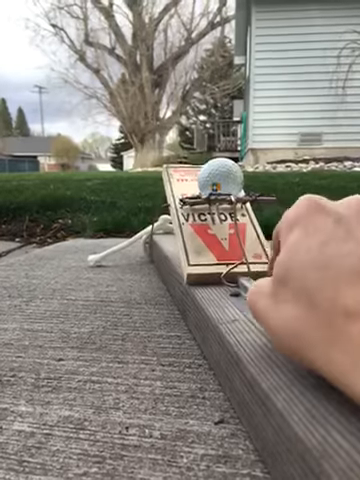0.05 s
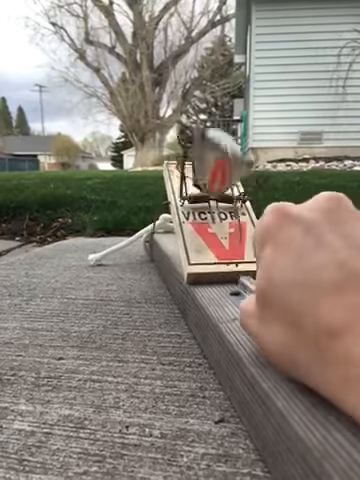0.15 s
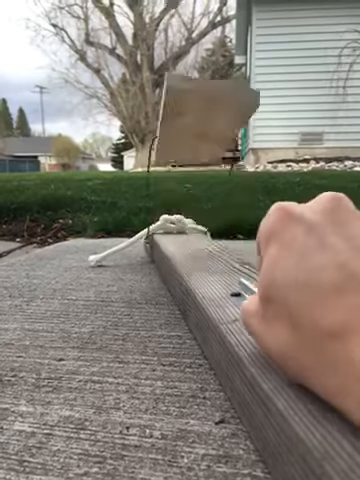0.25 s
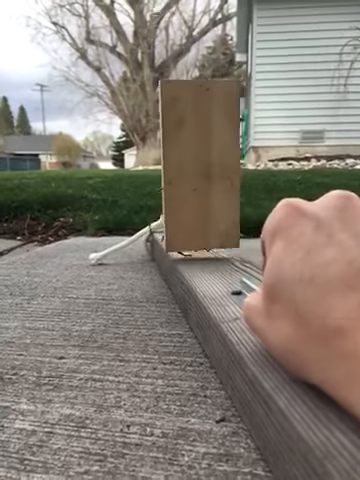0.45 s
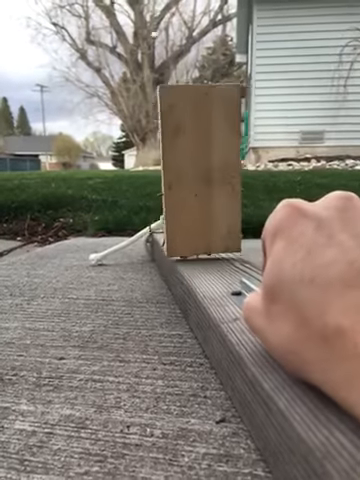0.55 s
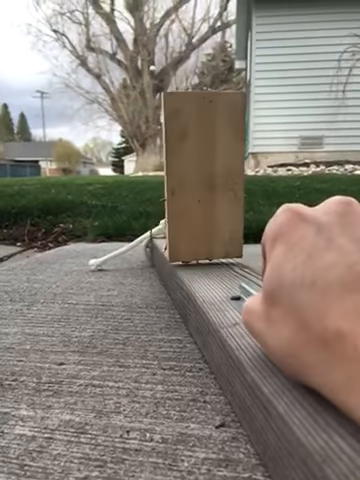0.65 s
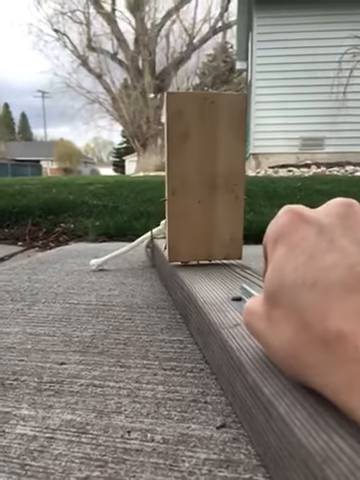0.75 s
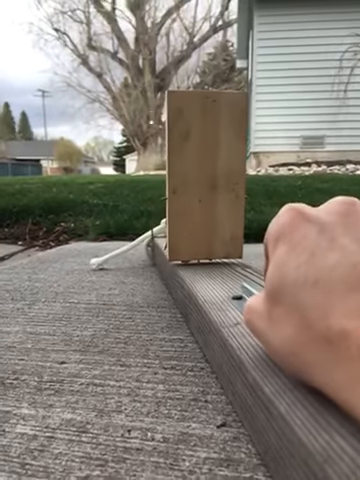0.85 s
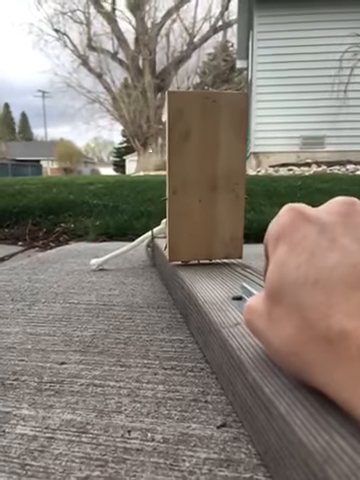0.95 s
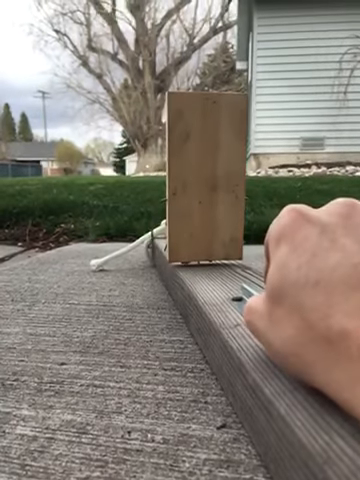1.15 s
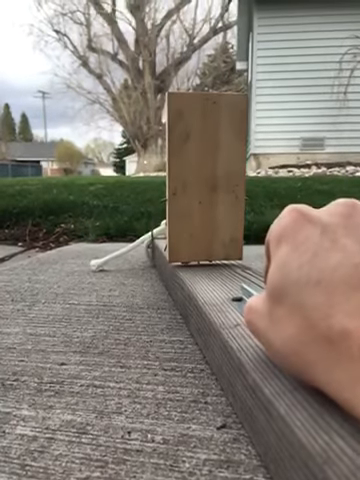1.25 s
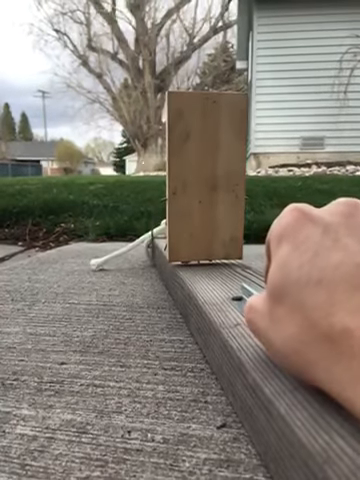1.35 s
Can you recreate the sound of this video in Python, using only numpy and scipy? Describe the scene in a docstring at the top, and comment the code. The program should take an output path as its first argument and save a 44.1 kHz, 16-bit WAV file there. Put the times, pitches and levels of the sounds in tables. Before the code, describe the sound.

A spring rat trap snaps loudly, then clatters onto a wooden beam outdoors.

```python
"""Three sharp cracks within 30 ms, then a clatter: a spring rat trap goes off close by, outdoors.
Its bar slams onto the board, loud enough to overload the microphone. The trap leaps, lands on a
wooden beam, rattles its loose wires and settles. The yard gives a faint echo, and a breeze
buffets the microphone over the rumble of distant traffic."""
import sys
import numpy as np
from scipy import signal
from scipy.fft import rfft, irfft
from scipy.io import wavfile
from scipy.ndimage import uniform_filter1d

SR = 44100
rng = np.random.default_rng(int(sys.argv[2]) if len(sys.argv) > 2 else 0)


def generate_wav(sig):
    """Save sig (samples, or channels by samples) to the path in sys.argv[1] as 16-bit PCM at SR."""
    pcm = np.round(np.clip(np.atleast_2d(sig).T, -1, 1) * 32767).astype(np.int16)
    wavfile.write(sys.argv[1], SR, pcm)


N = 61739

# A fade time (t60) is how long a sound takes to drop by 60 dB. A tilt above zero makes it brighter.
# The tones that board and spring ring with: (pitch [Hz], level [dB], fade time [s])
TRAP_TONES = [(1058, -27, .14), (1180, -25, .13), (1252, -18, .15), (1316, -21, .13), (1460, -15, .045),
              (2020, -3, .045), (1670, -29, .08), (2561, -17, .06), (2803, -15, .06), (3091, -16, .06),
              (3610, -21, .09), (4258, -14, .05), (8394, -15, .05), (8672, -15, .045)]
# Knocks on the beam: (time [s], level [dB], fade time [s], tilt [dB per octave], thud level [dB])
KNOCKS = [(0.422, -28.5, 0.056, 2.5, -62), (0.4308, -34, 0.091, 21, -60), (0.4365, -33, 0.056, -2, -52),
          (0.4425, -33.5, 0.031, 7, -64), (0.4498, -31, 0.023, 4.5, -41.5), (0.4514, -28, 0.026, -8.5, -41),
          (0.459, -43, 0.076, -3.5, -51), (0.5375, -45.5, 0.045, -5.5, -74),
          (0.5426, -42, 0.061, -2.5, -50.5), (0.655, -50, 0.067, -7.5, -54.5)]


def snap():
    """The bar whips over and slams down: cracks, a ringing board, a buzzing spring and a push of air."""
    # Blows of the bar: (time [s], level [dB], chatter length [s], tilt [dB per octave], air push [dB])
    blows = [(0.2123, -11.5, 0.0051, 0, -44), (0.2281, -8.5, 0.0039, -0.24, -38.5),
             (0.2405, -4, 0.0054, -0.26, -20.5)]
    # Tone colour of a crack: (frequency [Hz], relative level [dB])
    crack_colour = [(100, -16), (280, -3), (420, -11), (900, -4.5), (1400, -3), (2200, 0), (4000, -3.5),
                    (6000, -6), (8600, -2.5), (11000, -8), (15000, -7)]
    buzz_dull_hz, push_hz, push_delay_s = 3500, 68, 0.0038
    out, t = np.zeros(N), clock()
    for start, db, chatter_s, tilt_db, push_db in blows:
        gain = colour(crack_colour, tilt_db)
        crack = burst(gain, t60=0.028, slope=-0.1, hold=chatter_s)
        buzz = undb(-13) * noise(gain / np.sqrt(1 + bins() / buzz_dull_hz)) * fade(t, t60=0.12)
        push = undb(push_db) * np.sin(2 * np.pi * push_hz * t) * fade(t, t60=0.085)
        add(out, start, undb(db) * (crack + buzz + undb(-2) * ring(TRAP_TONES)))
        add(out, start + push_delay_s, push)
    return out


def landing():
    """The board rocks to rest, knocking on the beam, which thuds and cuts the board's ringing short."""
    # Tone colour of a knock: (frequency [Hz], relative level [dB])
    knock_colour = [(150, -13), (600, -20.5), (1000, -5.5), (1600, -0.5), (2900, -20), (4400, -8),
                    (7000, -23), (10000, -20.5), (15000, -32)]
    soft_hz = 2972  # wood on wood barely wakes the tones above this
    damped = [(hz, db - 20 * np.log10(1 + (hz / soft_hz) ** 2), 0.8 * t60) for hz, db, t60 in TRAP_TONES]
    out = np.zeros(N)
    for start, db, t60, tilt_db, thud_db in KNOCKS:
        knock = burst(colour(knock_colour, tilt_db), t60, slope=-0.11)
        thud = noise(hump(hz=360, octaves=2, order=2)) * fade(clock(), t60=0.11)
        add(out, start, undb(db) * (knock + undb(-1) * ring(damped)) + undb(thud_db) * thud)
    return out


def wires():
    """The loose catch and holding arm clink: each time a dry tick with a short, rough ring."""
    # Clinks: (time [s], level [dB], tick fade time [s], wire pitch [Hz], ring compared to tick [dB])
    clinks = [(0.19, -55.5, 0.09, 9200, -9), (0.2101, -37.5, 0.032, 4180, 3.5),
              (0.281, -60, 0.029, 3520, -5), (0.429, -62, 0.024, 4250, -11), (0.4212, -32, .022, 4200, 1),
              (0.4555, -38, .04, 4180, -4), (0.4628, -39, .03, 9000, -14), (0.4705, -51, .03, 4150, 4),
              (0.501, -61, .05, 9000, -4), (0.5812, -50.5, 0.1, 6220, -6), (0.686, -63.5, 0.068, 8950, -3)]
    # Tone colour of a tick: (frequency [Hz], relative level [dB])
    tick_colour = [(200, -15.5), (1000, 1.5), (2200, 8.5), (3200, -11.5), (6300, 0), (9500, -14.5),
                   (15000, -13.5)]
    out = np.zeros(N)
    for start, db, t60, hz, ring_db in clinks:
        tick = noise(colour(tick_colour)) * fade(clock(), t60)
        rough_ring = noise(hump(hz, octaves=0.04)) * fade(clock(), t60=0.04)
        add(out, start, undb(db) * (tick + undb(ring_db) * rough_ring))
    return out


def trigger():
    """The catch begins to slip with a short scrape, just before the snap."""
    return undb(-46) * noise(hump(hz=1570, octaves=0.16)) * swell(peak_s=0.066, width_s=0.0035)


def tremble():
    """From the first knock on the beam, the loose parts buzz on ever more faintly."""
    out = np.zeros(N)
    buzz = noise(hump(hz=2480, octaves=1.43, order=2)) * fade(clock(), t60=0.75)
    add(out, KNOCKS[0][0], undb(-55) * buzz)
    return out


def yard_echo(sound):
    """House wall, ground and trees scatter a faint echo back."""
    # Tone colour of the echo: (frequency [Hz], relative level [dB])
    echo_colour = [(150, -7.5), (700, -8), (1300, -0.5), (3000, 6), (5500, -1), (10000, -10.5),
                   (15000, -13.5)]
    tail = np.zeros(N)
    add(tail, start=0.011, sound=burst(colour(echo_colour), t60=0.42, slope=-0.12))
    tail /= np.sqrt(np.sum(tail ** 2))
    return undb(-37) * signal.fftconvolve(sound, tail)[:N]


def wind():
    """Air swirling on the microphone rumbles with each gust; a few deep buffets stand out."""
    # Strength of the breeze: (time [s], level [dB])
    gusts = [(0, -35.5), (.05, -41.5), (.096, -51), (.19, -43.5), (.31, -56.5), (.41, -56.5),
             (0.477, -39.5), (.56, -36.5), (.63, -45), (0.691, -35.5), (.82, -39.5), (.88, -47.5),
             (.92, -39), (1.05, -43), (1.09, -50.5), (1.28, -54), (1.34, -65.5), (1.4, -37)]
    # Tone colour of the breeze: (frequency [Hz], relative level [dB])
    wind_colour = [(20, -29), (40, -8), (65, 0.5), (105, -3.5), (150, -10), (220, -26.5), (400, -34),
                   (1000, -59.5), (8000, -100)]
    # Deep bumps of air: (time [s], level [dB], width [s], pitch [Hz])
    buffets = [(0.018, -36, 0.031, 52), (0.487, -27, 0.0033, 89), (0.685, -39.5, 0.034, 64.3),
               (0.755, -51, 0.017, 80.4), (1.205, -37.5, 0.0054, 83.7)]
    gust_db = np.interp(clock(), *np.array(gusts).T)
    out = undb(gust_db) * swirl(colour(wind_colour))
    for peak_s, db, width_s, hz in buffets:
        out += undb(db) * swell(peak_s, width_s) * swirl(hump(hz, octaves=0.49, order=2))
    return out


def town():
    """The distant town rumbles steadily, and a low hum of traffic grows towards the end."""
    # Tone colour of the rumble: (frequency [Hz], relative level [dB])
    town_colour = [(120, -25.5), (200, 0), (344, -12.5), (521, -9.5), (591, -5.5), (659, -15.5), (929, -10),
                   (1750, -22), (2290, -26), (15000, -51)]
    traffic = swell(peak_s=1.6, width_s=0.38) * noise(hump(hz=263.2, octaves=0.3))
    return undb(-56.5) * noise(colour(town_colour)) + undb(-50) * traffic


def undb(db):
    """Turn decibels into a gain, the number to multiply a sound by."""
    return 10 ** (np.asarray(db) / 20)


def clock():
    """The time of every sample, in seconds."""
    return np.arange(N) / SR


def bins():
    """The frequency of every thin slice (bin) of the spectrum, in Hz."""
    return np.maximum(np.arange(N // 2 + 1) * SR / N, 1)


def fade(age, t60):
    """Full strength until age zero, then 60 dB quieter every t60 seconds."""
    return np.exp(-np.log(1000) * np.maximum(age, 0) / t60)


def swell(peak_s, width_s):
    """A bell-shaped rise and fall."""
    return np.exp(-((clock() - peak_s) / width_s) ** 2 / 2)


def colour(points, tilt_db=0):
    """A gain for each bin, drawn through (Hz, dB) points and tilted; its average power is 1."""
    hz, db = np.array(points, float).T
    curve_db = np.interp(np.log(bins()), np.log(hz), db)
    gain = undb(curve_db + tilt_db * np.log2(np.maximum(bins(), hz[0])))
    return gain / np.sqrt(np.mean(gain ** 2))


def hump(hz, octaves, order=1):
    """A tone colour with one peak and average power 1; a higher order has steeper sides."""
    gain = 1 / (1 + (np.log2(bins() / hz) / octaves) ** 2) ** order
    return gain / np.sqrt(np.mean(gain ** 2))


def noise(gain):
    """Noise with the given tone colour."""
    return irfft(rfft(rng.standard_normal(N)) * gain, N)


def swirl(gain):
    """Swirling air: noise with its loudness evened out."""
    air = noise(gain)
    return air / np.sqrt(uniform_filter1d(air ** 2, size=2000))


def burst(gain, t60, slope, hold=0):
    """Noise that holds, then fades in t60 seconds at 2 kHz; with a slope below zero, highs die sooner."""
    out, spectrum = 0, rfft(rng.standard_normal(N)) * gain
    octaves_hz = 125 * 2. ** np.arange(8)
    for hz, share in zip(octaves_hz, np.eye(len(octaves_hz))):
        band = irfft(spectrum * np.interp(np.log(bins()), np.log(octaves_hz), share), N)
        out = out + band * fade(clock() - hold, t60 * (hz / 2000) ** slope)
    return out


def ring(tones, scatter_db=-0.5):
    """Pure tones that fade away, struck a little differently each time."""
    t = clock()[:N // 2]
    out = np.zeros(N)
    for hz, db, t60 in tones:
        nudge, phase = rng.standard_normal(2)
        out[:len(t)] += undb(db + scatter_db * nudge) * fade(t, t60) * np.sin(2 * np.pi * (hz * t + phase))
    return out


def add(track, start, sound):
    """Mix a sound into the track from its start time, in seconds."""
    i = int(start * SR)
    track[i:] += sound[:N - i]


def scene():
    """The trap and its echo over wind and town, in one channel."""
    trap = trigger() + snap() + landing() + wires() + tremble()
    fade_in = np.minimum(clock() / 0.006, 1)
    outdoors = (wind() + town()) * fade_in
    return (trap + yard_echo(trap) + outdoors)[None]


def record(dry):
    """The microphone loses the highest treble and flattens the loudest peaks."""
    top_hz, ceiling = 15400, 0.68
    lowpass = signal.ellip(10, .1, 60, top_hz, fs=SR, output="sos")
    heard = signal.sosfilt(lowpass, dry)
    flattened = heard / (1 + (heard / ceiling) ** 6) ** (1 / 6)
    return signal.sosfiltfilt(lowpass, flattened)


dry = scene()
out = record(dry)
generate_wav(out)
```